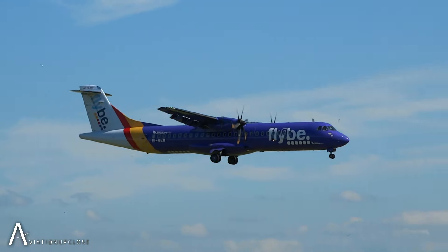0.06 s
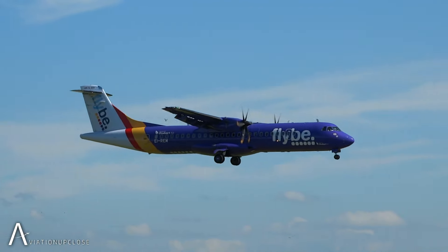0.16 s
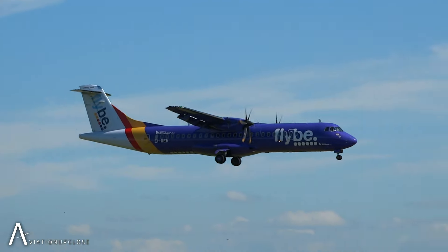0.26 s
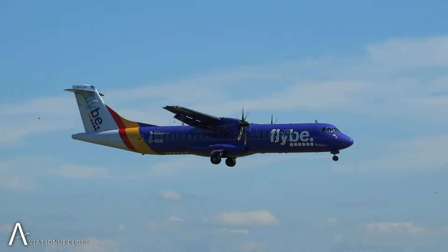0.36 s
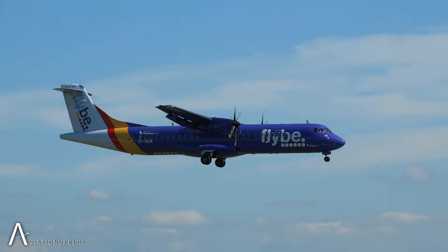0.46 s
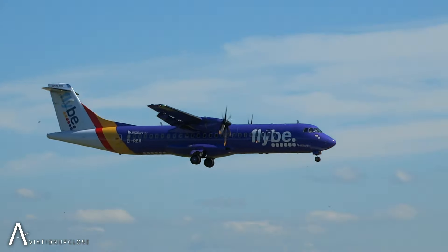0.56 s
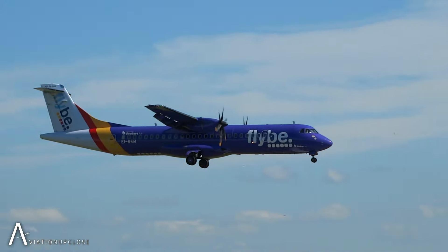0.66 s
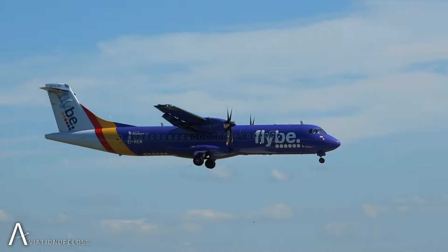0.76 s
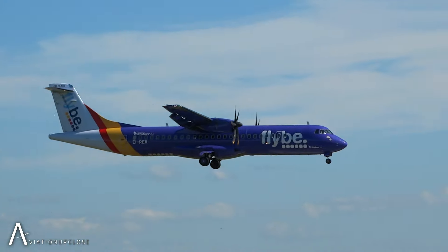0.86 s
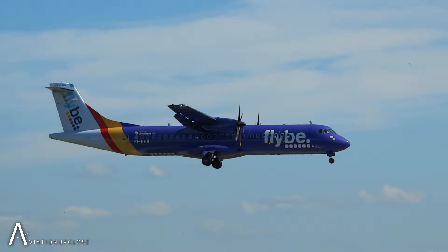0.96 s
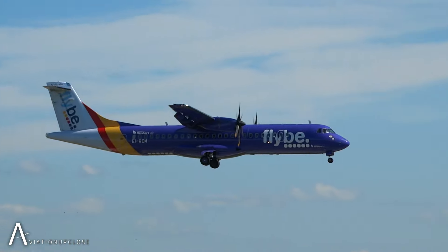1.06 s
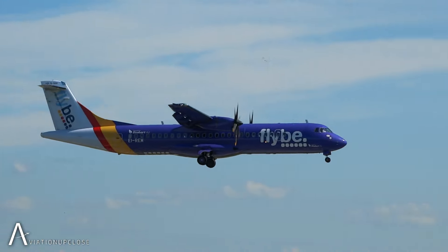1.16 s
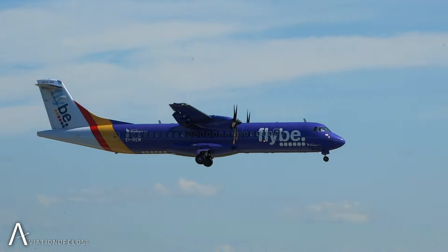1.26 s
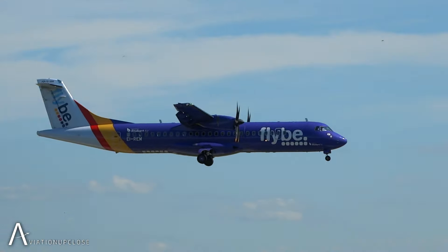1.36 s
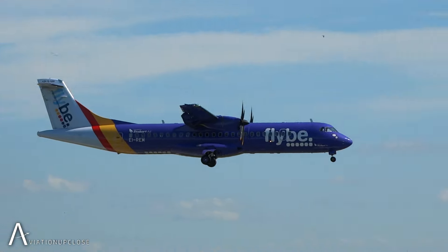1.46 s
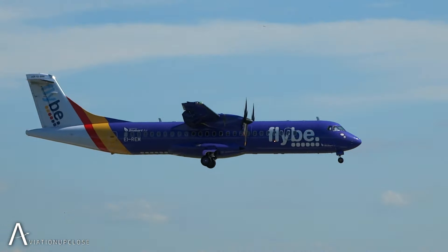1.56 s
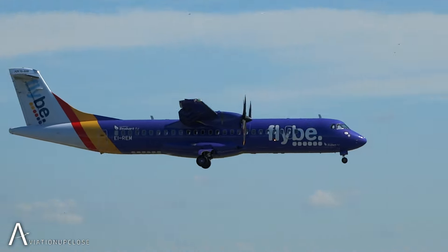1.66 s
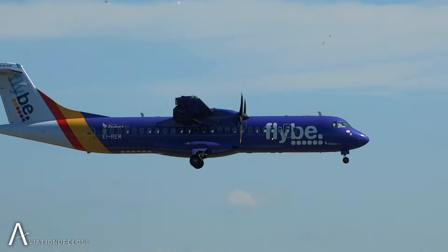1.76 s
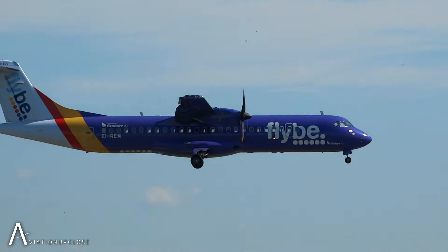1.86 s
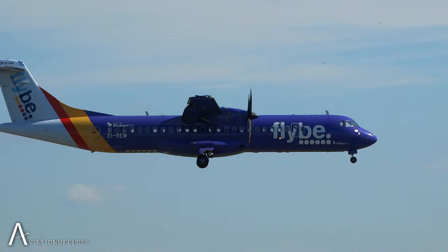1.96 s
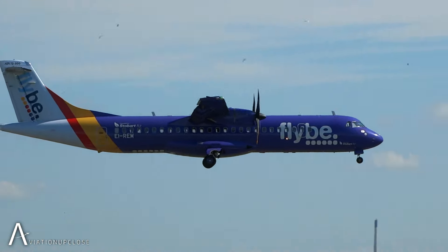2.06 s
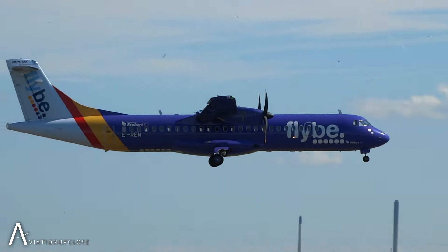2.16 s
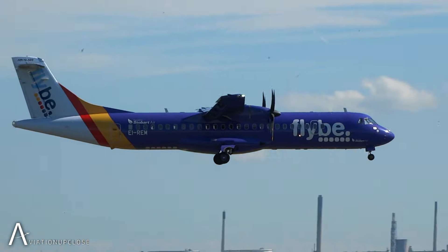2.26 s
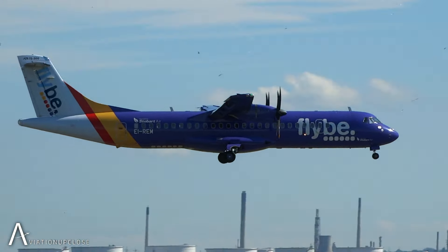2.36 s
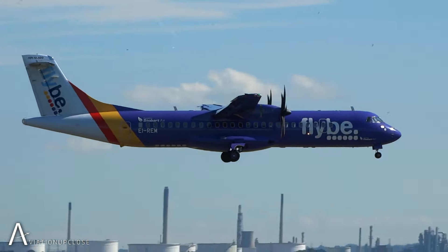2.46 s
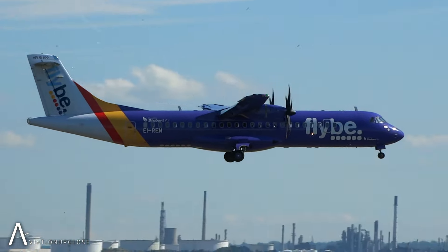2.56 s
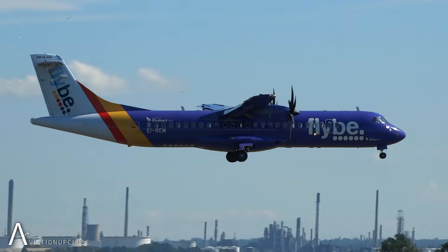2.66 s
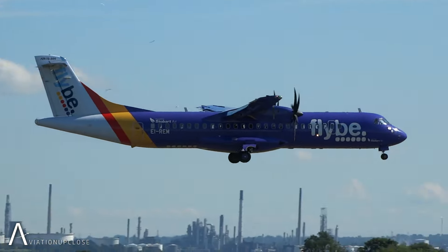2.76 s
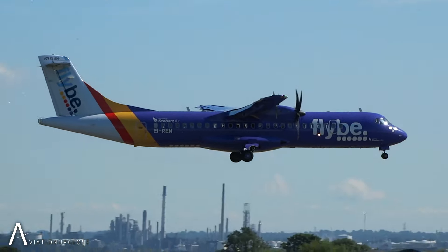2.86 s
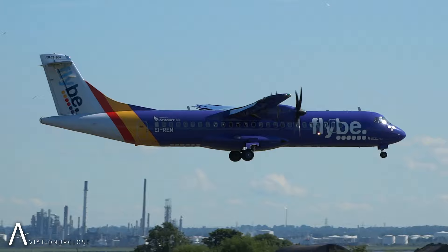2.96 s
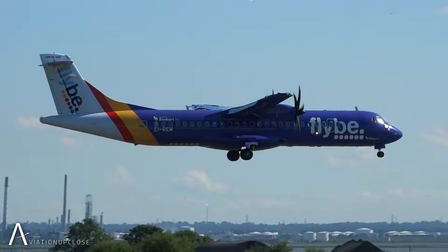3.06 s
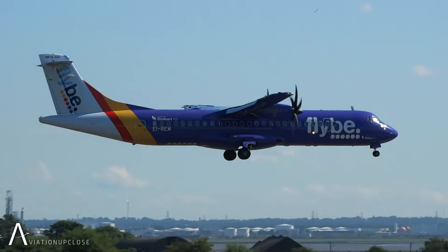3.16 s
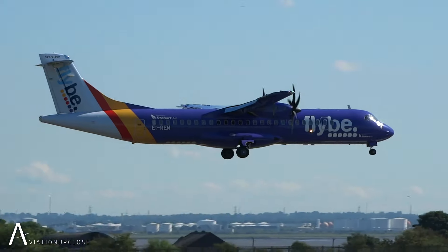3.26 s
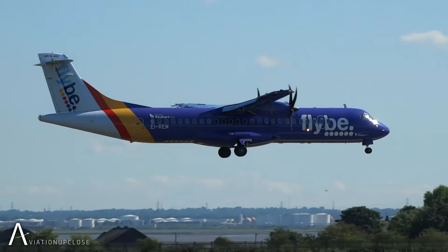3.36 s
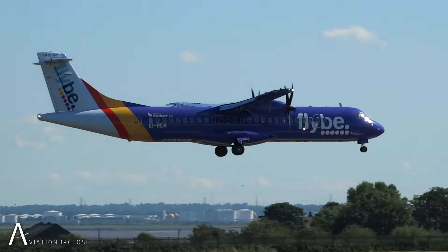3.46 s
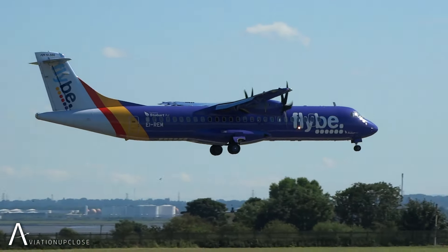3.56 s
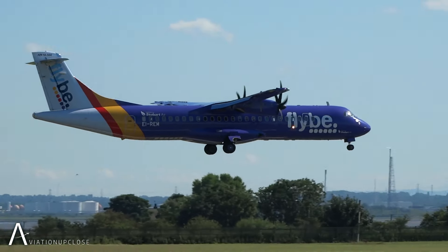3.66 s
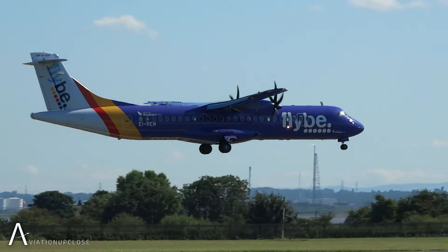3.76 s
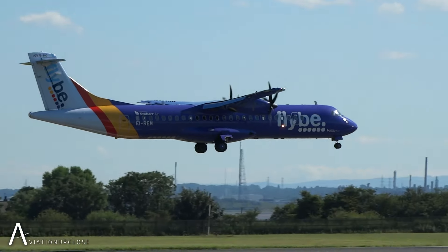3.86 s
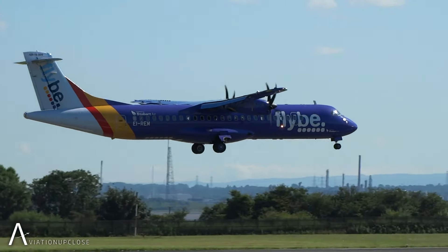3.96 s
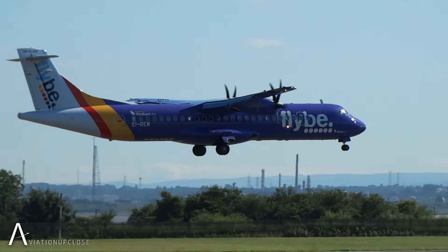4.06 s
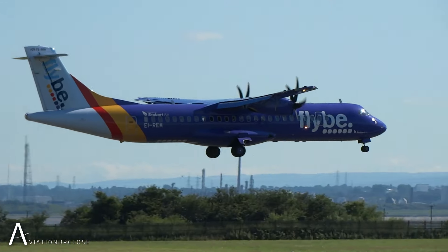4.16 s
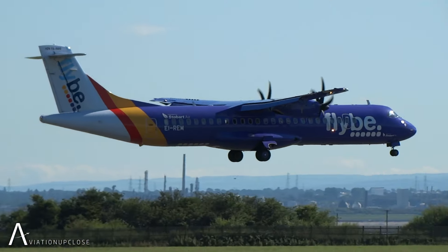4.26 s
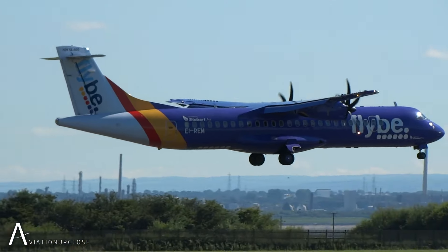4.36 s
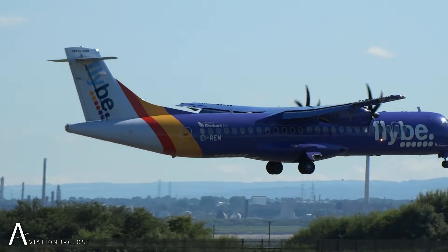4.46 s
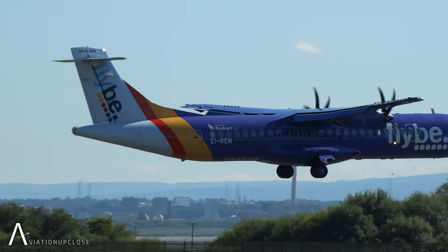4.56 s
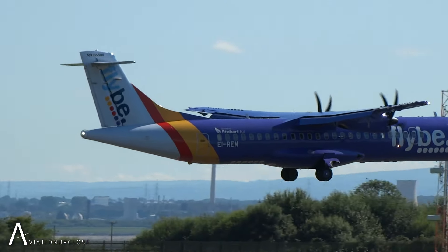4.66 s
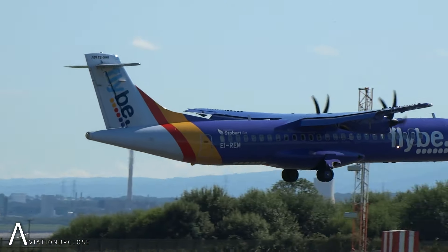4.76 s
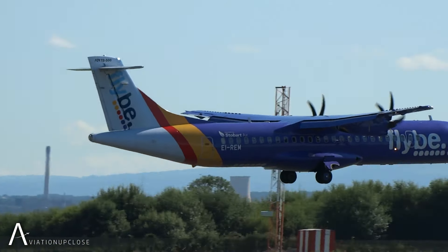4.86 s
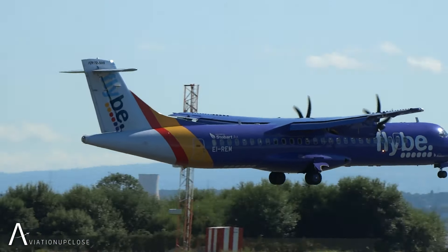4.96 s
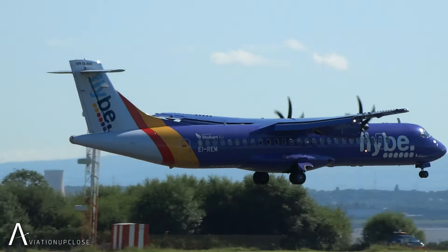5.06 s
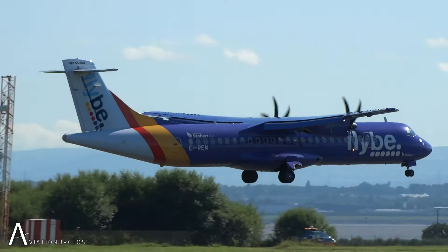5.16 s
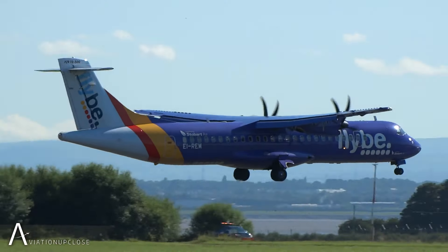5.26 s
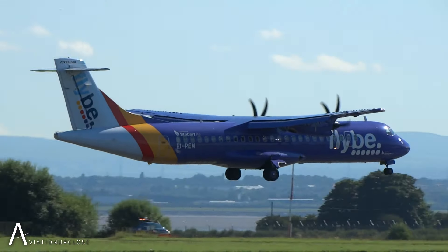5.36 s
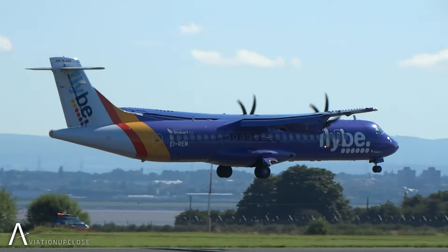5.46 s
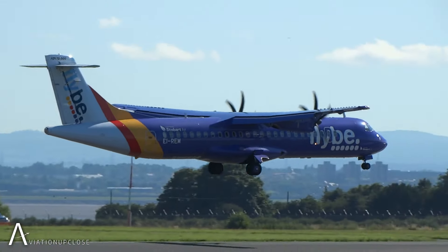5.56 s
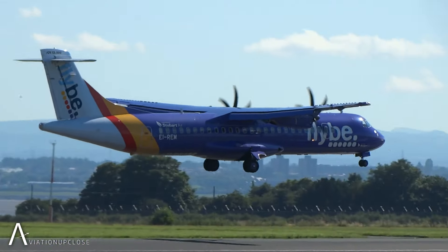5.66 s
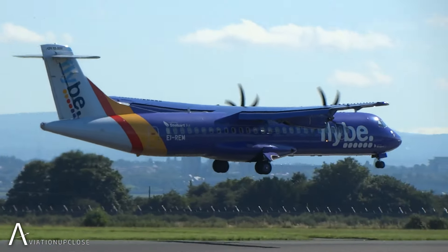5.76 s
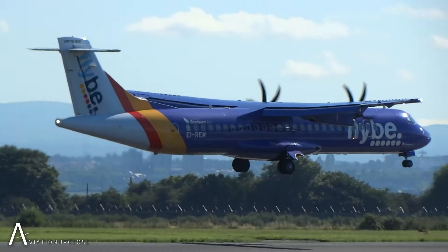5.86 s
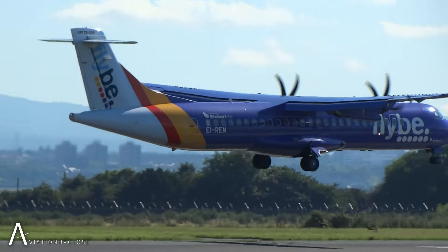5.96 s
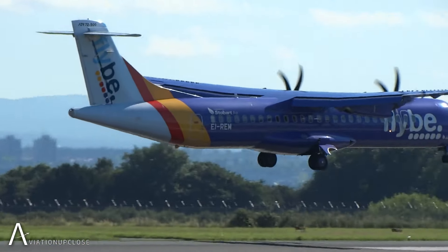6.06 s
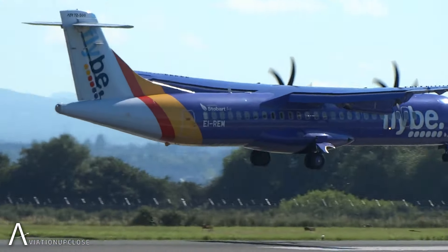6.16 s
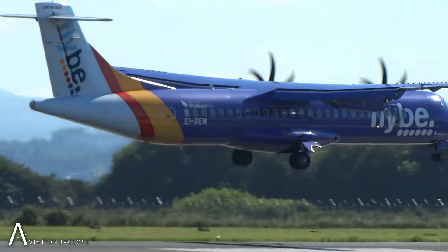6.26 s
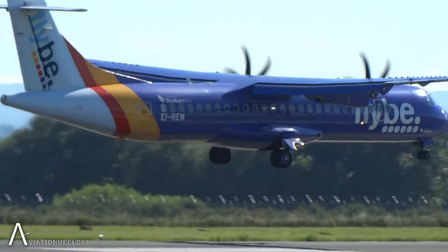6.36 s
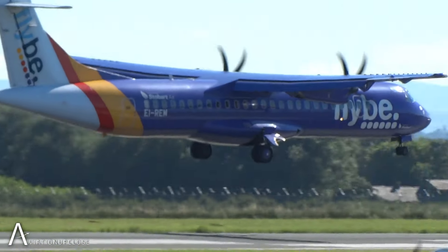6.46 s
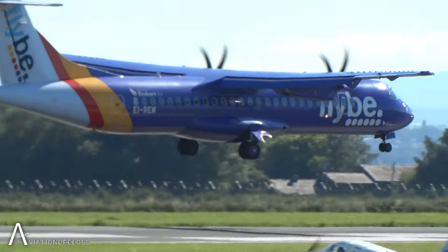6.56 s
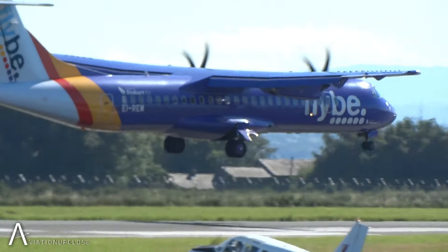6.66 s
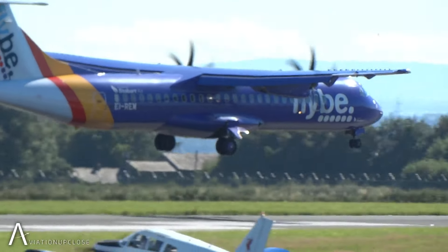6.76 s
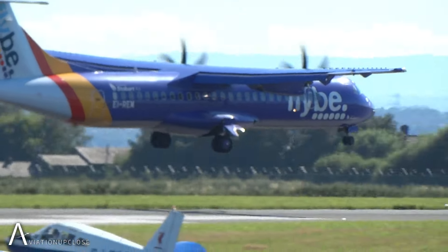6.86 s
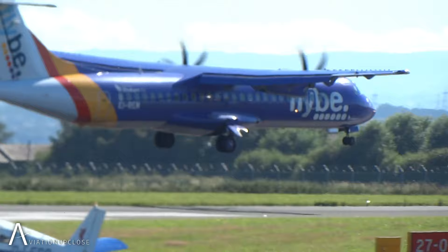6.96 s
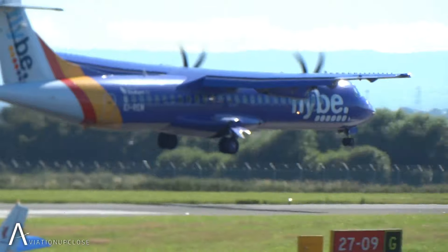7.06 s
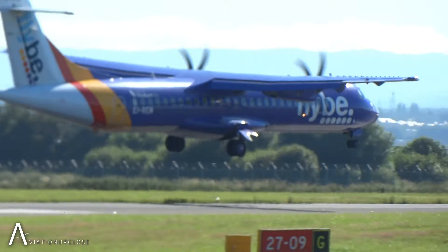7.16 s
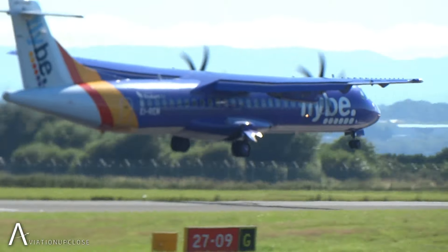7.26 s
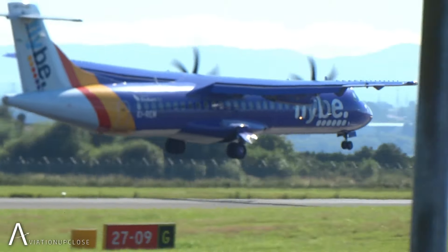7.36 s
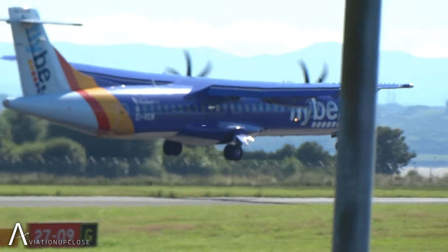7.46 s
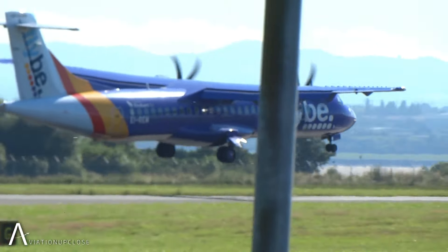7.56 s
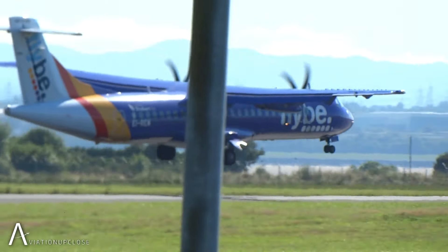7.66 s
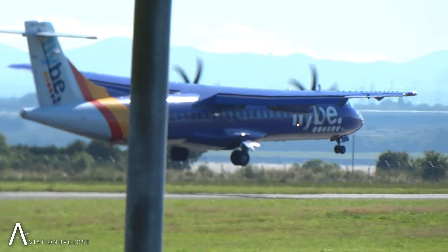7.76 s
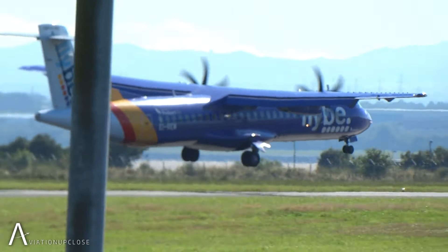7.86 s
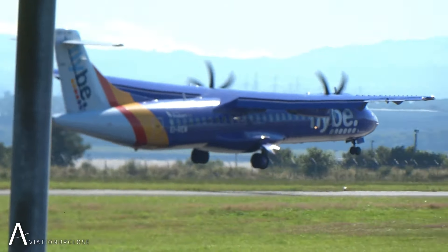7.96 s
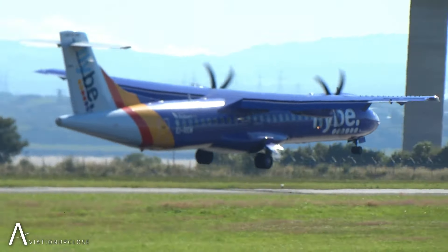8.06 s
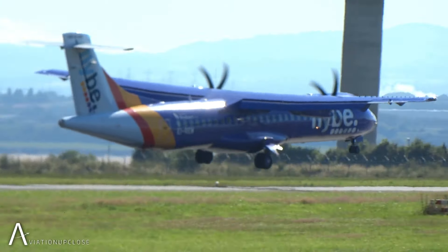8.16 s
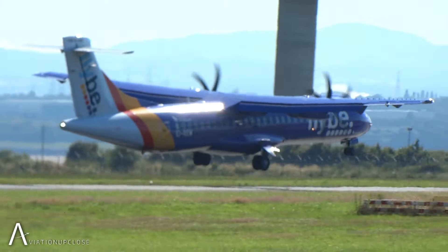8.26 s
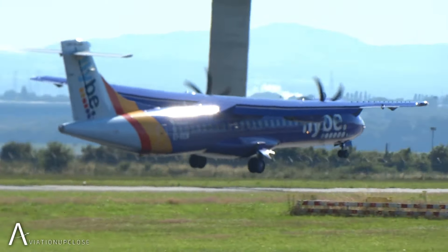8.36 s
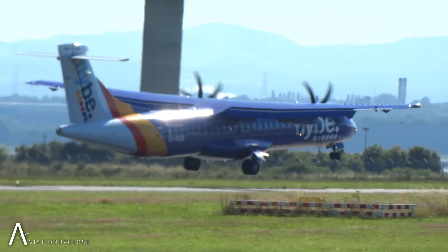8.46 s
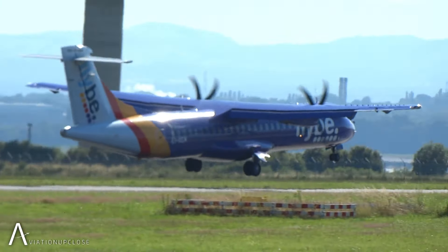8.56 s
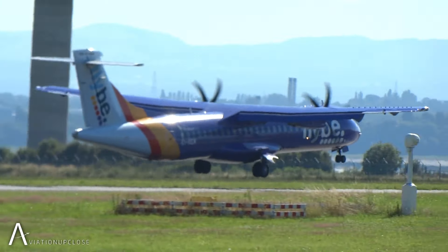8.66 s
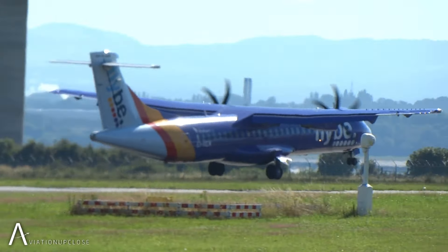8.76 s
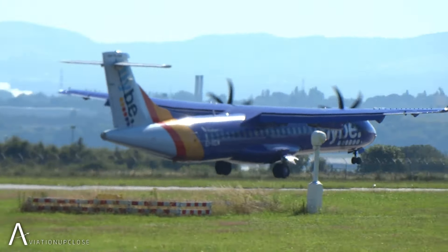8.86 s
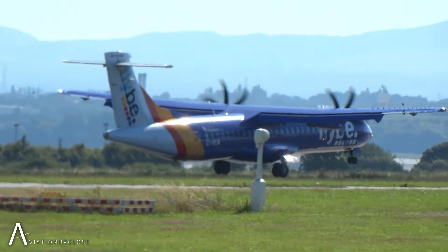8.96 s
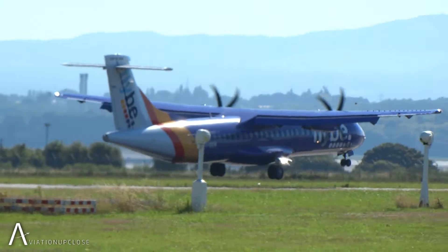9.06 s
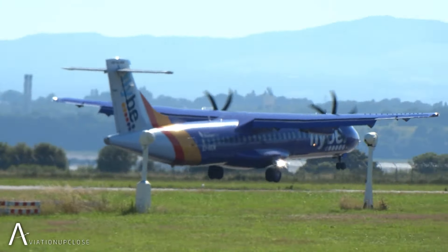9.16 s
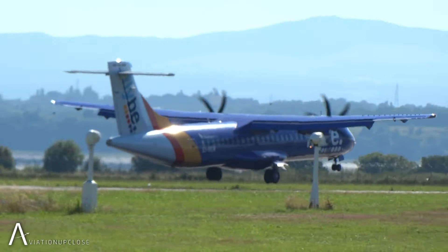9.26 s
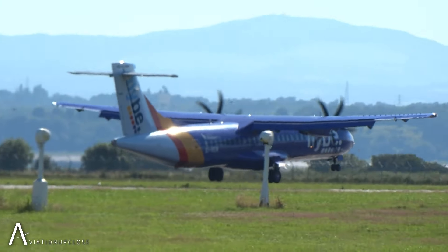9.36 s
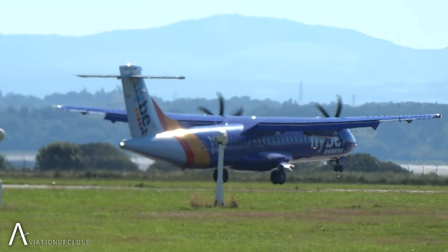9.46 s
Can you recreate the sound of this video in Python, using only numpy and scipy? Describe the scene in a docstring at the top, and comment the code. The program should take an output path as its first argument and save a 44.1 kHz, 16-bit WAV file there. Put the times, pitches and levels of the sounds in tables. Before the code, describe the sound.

Outdoors at an airfield, a twin-propeller airliner on approach is already loud: a howling, airy roar with gear whine and piercing turbine whistles. It flutters and surges in quick swells, the tones sliding down as it passes around three seconds. Then the roar darkens and fades unevenly, leaving a softer rush, a faint low engine drone and distant rumble. Stereo microphones stay nearby, the image nearly central.

```python
"""A twin-turboprop airliner on final approach passes by from left to right and sinks away over the runway.
It comes in as a roar of coloured noise that swells and dips, with a thin high whistle.
The gear whine and the engine whistles are scattered tones that slide down with the Doppler shift.
As the roar recedes, a faint engine drone of a few partials comes through; the field rumbles throughout."""
import sys
import numpy as np
from scipy import signal
from scipy.fft import rfft, irfft, next_fast_len
from scipy.io import wavfile
from scipy.ndimage import uniform_filter1d

SR = 44100
rng = np.random.default_rng(int(sys.argv[2]) if len(sys.argv) > 2 else 0)


def log_audio(samples):
    """Write samples as a 16-bit WAV file to the path given in sys.argv[1]."""
    # one column per channel
    frames = np.atleast_2d(samples).T
    # limit to full scale, then quantise
    limited = np.clip(frames, -1, 1)
    pcm = np.round(limited * 32767).astype(np.int16)
    wavfile.write(sys.argv[1], SR, pcm)


N = 419832
TIME = np.arange(N) / SR


def undb(db):
    """Decibels to gain."""
    return 10 ** (np.asarray(db) / 20)


def unit(x):
    """Scale to rms 1."""
    return x / np.sqrt(np.mean(np.abs(x) ** 2))


def curves(table):
    """Each column of a table as a curve over time."""
    s, *columns = np.transpose(table)
    return [np.interp(TIME, s, c) for c in columns]


def over_pitch(f, hz, values):
    """Read values at frequencies f, on a logarithmic pitch scale."""
    return np.interp(np.log(f), np.log(hz), values)


def shape(x, gain):
    """Filter with a gain given as a function of frequency."""
    size = next_fast_len(N)
    f = np.maximum(np.arange(size // 2 + 1) * SR / size, 1)
    return irfft(rfft(x, size) * gain(f), size)[:N]


def noise(spectrum):
    """Noise of rms 1 with a colour of (Hz, dB) points, falling 12 dB per octave beyond the ends."""
    hz, db = np.transpose(spectrum)

    def colour(f):
        ends = np.minimum(1, np.minimum(f / hz[0], hz[-1] / f)) ** 2
        return undb(over_pitch(f, hz, db)) * ends

    return unit(shape(rng.standard_normal(N), colour))


def walk(rate):
    """Smooth chance of rms 1 that changes about rate times a second."""
    k = max(int(SR / rate), 1)
    count = N // k + 3
    steps = np.interp(np.arange(N) / k + rng.random(), np.arange(count), rng.standard_normal(count))
    return unit(uniform_filter1d(steps, k))


def tone(hz, flutter_rate, scatter):
    """A whistle of rms 1: the direct ray plus rays scattered by eddies, with wandering phase."""
    rays = unit(1 + scatter * (walk(flutter_rate) + 1j * walk(flutter_rate)))
    return np.sqrt(2) * np.real(rays * np.exp(2j * np.pi * np.cumsum(hz) / SR))


# Blend of three roar colours. Each row: time in seconds, colour (0 howling, 1 duller, 2 low and dark).
COLOUR_BLEND = [(0, 0), (3.3, 0.28), (4.7, 1.13), (6.2, 1.02), (7, 1.83), (7.6, 1.24), (8.3, 1.8)]


def eddies(x, patchy_db, seconds, width_hz, size=1024):
    """Turbulence lifts and dims patches of the spectrum, most at high pitches and in the howling colour."""
    hz, s, frames = signal.stft(x, SR, nperseg=size)
    patches = rng.standard_normal(frames.shape)
    for _ in range(2):
        patches = uniform_filter1d(patches, max(int(seconds / s[1]), 1), axis=1)
        patches = uniform_filter1d(patches, max(int(width_hz / hz[1]), 1), axis=0)
    by_pitch = np.interp(hz, [300, 1400, 2400, 4500], [0.15, 0.33, 0.63, 0.63])
    by_colour = 1 / (1 + np.interp(s, *np.transpose(COLOUR_BLEND)))
    depth_db = patchy_db * np.outer(by_pitch, by_colour)
    return signal.istft(frames * undb(depth_db * unit(patches)), SR, nperseg=size)[1][:N]


def register(x, low_hz, high_hz, db):
    """One register of the roar, its loudness evened out and then carried at the given level."""
    part = shape(x, lambda f: 1 / np.sqrt((1 + (low_hz / f) ** 20) * (1 + (f / high_hz) ** 20)))
    return part * undb(db) / np.sqrt(uniform_filter1d(part ** 2, SR // 6))


# The three colours of the roar. Each row: frequency in Hz, relative density in dB per Hz.
HOWLING = [(120, -36), (250, -13.5), (400, -10.5), (520, -3), (980, -6), (1400, -2), (2000, 3.5), (2300, 6),
           (2800, 1), (3650, -14.5), (4150, -12.5), (4800, -14), (6500, -5), (8100, -13), (8700, -22.5),
           (11000, -39.5)]
DULLER = [(130, -30.5), (400, -13.5), (860, -2.5), (1400, 1), (2250, -1.5), (2640, -4.5), (3180, -14.5),
          (3900, -20.5), (4500, -18.5), (5850, -10), (6550, -10), (8000, -20), (10800, -47.5)]
LOW_AND_DARK = [(160, -28), (230, -16.5), (350, -8.5), (520, -4.5), (750, 2.5), (1200, -1.5), (1600, -0.5),
                (1930, -5.5), (2330, -3), (3050, -9), (3550, -8.5), (3950, -19.5), (5100, -21.5),
                (6000, -14), (7900, -17), (10500, -51)]


def roar(rush_db, wash_db, howl_db, hiss_db):
    """Turbulence from airframe, propellers and engines; its colour turns as the aircraft goes by."""
    blend, = curves(COLOUR_BLEND)
    air = 0
    for k, colour in enumerate([HOWLING, DULLER, LOW_AND_DARK]):
        share = np.maximum(1 - np.abs(blend - k), 0)
        air = air + np.sqrt(share) * noise(colour)
    air = eddies(air, patchy_db=4.5, seconds=.035, width_hz=220)
    rush = register(air, 60, 1052, rush_db)
    wash = register(air, 1220, 2035, wash_db)
    howl = register(air, 2126, 3015, howl_db)
    hiss = register(air, 3630, 10260, hiss_db)
    # small eddies make the howl and the hiss flutter, short wavelengths most
    flutter_db = 0.71 * walk(18) + 0.39 * walk(200)
    hiss_flutter_db = 0.52 * walk(190)
    return rush + wash + undb(flutter_db) * (howl + undb(hiss_flutter_db) * hiss)


# Level of the low airframe rush. Each row: time in seconds, level in dB.
RUSH = [(0, -30.5), (1.2, -26.5), (3, -29.5), (4.05, -29.5), (4.4, -34), (5.2, -35.5), (6.4, -41.5),
        (8.5, -42), (9.52, -40.5)]
# Level of the engine roar between swells. Each row: time in seconds, level in dB.
ROAR = [(0, -31), (2.4, -29.5), (4.1, -32), (5.7, -36), (6.9, -39.5), (8.5, -44), (9.52, -42)]
HOWL_DB, HISS_DB = -0.73, -1.7  # relative to the roar
# the intakes turn out of sight and their hiss drops
SHADOW_S, SHADOW_FADE_S, SHADOW_DB = 5.55, 0.98, -5.5


def register_levels():
    """Levels in dB of rush, wash, howl and hiss: the slow fade of the pass."""
    (rush_db,), (roar_db,) = curves(RUSH), curves(ROAR)
    shadow_db = SHADOW_DB * np.clip((TIME - SHADOW_S) / SHADOW_FADE_S, 0, 1)
    return rush_db, roar_db, roar_db + HOWL_DB, roar_db + HISS_DB + shadow_db


# Swells and dips of the sound, some brief and some seconds long, each in its own range of pitches.
# Each row: centre in seconds, length in seconds, boost in dB, centre in Hz, spread in octaves either way.
SWELLS = [(0.418, 0.25, 5, 6560, 2.3), (.25, 0.75, 1.5, 1650, 0.18), (.64, 0.095, 12.5, 2430, 0.095),
          (0.717, .99, 7.5, 3340, 0.15), (0.835, 0.19, 6, 2520, 1.76), (0.923, .085, 7, 7400, 0.38),
          (1.14, 0.19, 9.5, 1500, 0.47), (1.346, 0.17, 11.5, 3170, 0.51), (1.56, 0.36, 7, 2300, 0.17),
          (1.333, 0.15, 5.5, 7450, 0.54), (1.645, 0.25, 12.5, 3260, 0.18), (1.74, .2, 4.5, 7500, 0.69),
          (1.76, 0.39, 9, 1760, 0.22), (2.04, 0.22, 6.5, 3960, 2.1), (2.286, 0.23, 8, 3800, 1.7),
          (2.448, .7, 4, 2340, 0.14), (2.628, 0.34, 6, 4850, 1.74), (2.943, .19, 7.5, 2650, 2),
          (2.863, 0.15, 5, 950, 0.54), (2.945, 0.18, 7, 2610, 0.12), (3.03, 0.044, -6, 2400, 0.4),
          (2.9, 2.8, -2.5, 1790, 0.24), (3.124, .17, 6, 2430, 0.25), (3.186, .25, 8.5, 4200, 1.47),
          (3.38, 0.086, -2, 3000, 1.1), (3.56, 0.27, 10, 3720, 2.2), (3.56, 0.05, 4, 2500, .35),
          (3.76, .084, 7, 2800, .45), (3.858, 0.17, -4.5, 2100, 0.26), (3.95, 0.095, 4.5, 5700, 0.9),
          (4.52, 0.034, 8.5, 5850, .37), (4.88, 0.43, 6.5, 3300, 2.3), (5.262, .27, 10, 2470, 1.4),
          (5.427, 0.12, 8.5, 6170, 0.86), (5.53, 0.25, 8, 2220, 1), (5.95, 0.42, 5.5, 2700, 1.03),
          (6.184, 0.54, 7.5, 4200, 1.7), (6.187, 0.032, 5, 5900, 0.41), (6.57, 0.18, 5.5, 5200, 0.88),
          (7.594, 0.41, 8, 4150, 2.3), (7.71, 0.088, 8, 1880, .3), (7.993, 0.38, 4, 4570, 1.5),
          (8.6, 2.2, -3, 1290, 0.14)]
SWELL_STEEPNESS = 2.5  # 2 is a bell, more gives a flatter top and quicker flanks


def swells(x, size=1024):
    """Each swell lifts (or dims) a range of pitches, rising and falling smoothly around its centre."""
    hz, s, frames = signal.stft(x, SR, nperseg=size)
    lift_db = 0
    for at, length, boost_db, centre_hz, octaves in SWELLS:
        rise_and_fall = np.exp(-np.abs(2 * (s - at) / length) ** SWELL_STEEPNESS)
        reach = np.exp(-(np.log2(np.maximum(hz, 1) / centre_hz) / octaves) ** 2)
        lift_db = lift_db + boost_db * np.outer(reach, rise_and_fall)
    return signal.istft(frames * undb(lift_db), SR, nperseg=size)[1][:N]


# the pass: blade-passing rate at the aircraft, speed, moment and distance of closest approach
BLADE_HZ, SPEED_M_S, CLOSEST_S, DISTANCE_M = 76.44, 62.7, 2.69, 288.6


def doppler():
    """Pitch factor of a source flying past in a straight line."""
    along = SPEED_M_S * (TIME - CLOSEST_S)
    receding_m_s = SPEED_M_S * along / np.hypot(along, DISTANCE_M)
    return 1 / (1 + receding_m_s / 343)  # speed of sound in m/s


# Compressor whistle. Each row: time in seconds, level in dB relative to the hiss.
COMPRESSOR_BEAM = [(0, -6.5), (.4, -3.5), (.9, -7.5), (2.4, -19.5), (4.55, -16), (4.76, -8), (5.1, -16.5),
                   (5.95, -8), (6.2, -12), (6.62, -10), (6.85, -19), (8.03, -9), (8.2, -16)]


def compressors(blade_hz):
    """One whistle per engine: the far one on the approach, the near one taking over towards abeam."""
    near_share = np.clip(TIME / CLOSEST_S, 0, 1)
    near = np.sqrt(near_share) * tone(71.2 * blade_hz, flutter_rate=110, scatter=1.6)
    far = np.sqrt(1 - near_share) * tone(70.6 * blade_hz, flutter_rate=220, scatter=1.8)
    beam_db, = curves(COMPRESSOR_BEAM)
    return undb(beam_db + 1.0 * walk(17)) * (near + far)


# Pitches of the turbine whistles, as multiples of the blade rate.
TURBINE_LINES = [80.3, 81.6, 82.9, 84.3, 85.8, 87.4, 89, 90.6]
# Turbine whistles. Each row: time in seconds, level in dB relative to the hiss,
# multiple of the blade rate that is beamed at the listener.
TURBINE = [(0, -15, 80), (1.8, -16, 81), (2.2, -4.5, 81.6), (2.65, -2, 82.7), (3, -10, 83.5),
           (3.45, -9.5, 85.5), (4.2, -5.5, 89), (4.85, -8, 90.6), (5.2, -14, 83), (6.1, -2, 85.8),
           (6.7, -10, 85.6), (9.52, -23, 86)]
TURBINE_FLICKER_DB, TURBINE_FLICKER_HZ = 4.5, 89.8  # rms depth and rate of the quick trill in level


def turbines(blade_hz):
    """A cluster of rough whistles, each with its own beam that sweeps over the listener in turn."""
    db, beamed = curves(TURBINE)
    beams = [1 / (1 + ((k - beamed) / 1.0) ** 2) for k in TURBINE_LINES]
    cluster = 0
    for beam, k in zip(beams, TURBINE_LINES):
        cluster = cluster + beam * tone(k * blade_hz, flutter_rate=280, scatter=1.9)
    cluster = cluster / np.linalg.norm(beams, axis=0)
    trill = tone(np.full(N, TURBINE_FLICKER_HZ), flutter_rate=20, scatter=1)
    flicker = unit(undb(TURBINE_FLICKER_DB * trill))
    return undb(db) * flicker * cluster


# Gear whine, beamed forwards. Each row: time in seconds, level in dB.
GEAR = [(0, -35), (.3, -38), (.42, -29), (1.25, -29.5), (1.64, -35), (2.25, -31), (3.1, -38), (3.65, -32.5),
        (4.2, -36), (4.6, -57), (6.6, -56), (7.3, -49), (8.2, -61)]


def gearboxes(blade_hz):
    """The whine of two propeller gearboxes that beat against each other until the far one fades."""
    near = tone(12.5 * blade_hz, flutter_rate=30, scatter=0.12 + 0.058 * TIME)
    far = undb(-4.5 - 2.2 * TIME) * tone(12.86 * blade_hz, flutter_rate=16, scatter=0.24)
    level_db, = curves(GEAR)
    return undb(level_db) * (near + far)


# Rate and strength of the engine drone. Each row: time in seconds, rate in Hz, gain in dB.
DRONE_RATE = [(4.6, 70.2, -10), (5.4, 69.8, 1), (5.85, 67.7, 1), (6.6, 67.3, -1), (7.25, 69.5, 2.5),
              (8.4, 68.1, -1), (9.52, 68.2, 1.5)]
# Partials of the drone. Each row: multiple of its rate, level in dB before that gain.
DRONE = [(5, -61), (6, -61.5), (7, -62.5), (9, -60), (10, -53), (11, -57.5)]
DRONE_FADE_DB, DRONE_WANDER = 1.5, .002  # rms fade of each partial; rms share by which the pitch wanders


def drone():
    """A faint engine drone that sags and recovers in pitch while its partials fade in and out."""
    hz, level_db = curves(DRONE_RATE)
    hz = hz * (1 + DRONE_WANDER * walk(2))
    partials = 0
    for k, db in DRONE:
        fade = unit(undb(DRONE_FADE_DB * walk(2.05)))
        partials = partials + undb(db) * fade * tone(k * hz, flutter_rate=9, scatter=0.45)
    return undb(level_db) * partials


# Thin high whistle. Each row: time in seconds, pitch in Hz, level in dB.
THIN_WHISTLE = [(.5, 8550, -60), (.6, 9800, -59), (.8, 9140, -48), (1, 8550, -63), (1.11, 9120, -50),
                (1.24, 8700, -53), (1.35, 9400, -48), (1.54, 8700, -62), (1.64, 9000, -54),
                (1.72, 8750, -62)]


def thin_whistle():
    """A faint high whistle that wanders up and down during the approach."""
    hz, db = curves(THIN_WHISTLE)
    sounding = (TIME > THIN_WHISTLE[0][0]) & (TIME < THIN_WHISTLE[-1][0])
    return sounding * undb(db) * tone(hz * (1 + 0.002 * walk(60)), flutter_rate=200, scatter=0.45)


# Sound scattered back by the field. Each row: frequency in Hz, level in dB relative to the direct sound.
DIFFUSE = [(130, -30), (700, -25), (1150, -17.5), (2200, -28), (3900, -13.5), (6500, -28.5)]


def scattered(x):
    """The field sends a little sound back 37 ms late."""
    hz, db = np.transpose(DIFFUSE)
    late = np.pad(x, (int(.037 * SR), 0))[:N]
    return shape(late, lambda f: undb(over_pitch(f, hz, db)))


# Colour of the distant airfield rumble. Each row: frequency in Hz, relative density in dB per Hz.
FIELD = [(20, -21), (55, -12), (72, -2.5), (95, -1), (250, -17.5), (600, -37)]
FIELD_SIDE_DB = -30  # share of the rumble that differs between left and right


def airfield():
    """Distant rumble of low noise that slowly sinks."""
    apart = undb(FIELD_SIDE_DB) * np.array([[1], [-1]]) * noise(FIELD)
    return undb(-63 - 0.6 * TIME) * (noise(FIELD) + apart)


# Balance of the aircraft. Each row: time in seconds, left minus right in dB.
PAN = [(0, .5), (6, 0), (7, -1.2), (9.52, -1.5)]


def scene():
    """The aircraft crosses from left to right; a little of its sound comes back diffusely from the field."""
    blade_hz = BLADE_HZ * doppler()
    rush_db, wash_db, howl_db, hiss_db = register_levels()
    whistles = undb(hiss_db) * (compressors(blade_hz) + turbines(blade_hz))
    passing = roar(rush_db, wash_db, howl_db, hiss_db) + gearboxes(blade_hz) + whistles
    aircraft = swells(passing) + drone()
    pan_db, = curves(PAN)
    sides = np.array([[1], [-1]])
    direct = aircraft * undb(sides * pan_db / 2)
    # opposite sign left and right makes the scattered sound wide
    return direct + sides * scattered(aircraft) + airfield() + thin_whistle()


# Mismatch of the two microphones, half of it given to each side.
# Each row: frequency in Hz, nominal left minus right in dB, nominal lead of the left in radians.
PORTS = [(250, 0, -0.065), (800, 0.4, -0.17), (1050, 1, -0.23), (1450, -0.5, -0.2), (5000, 0.4, -.02)]
TOP_HZ = 10900


def record(dry):
    """Two microphones differ slightly in level and phase; a steep low-pass cuts the top."""
    hz, db, lead = np.transpose(PORTS)

    def port(x, side):
        response = undb(side * db / 2) * np.exp(1j * side * lead / 2)
        return shape(x, lambda f: over_pitch(f, hz, response))

    heard = np.array([port(dry[0], 1), port(dry[1], -1.07)])  # the right half is slightly stronger
    return signal.sosfilt(signal.ellip(8, .2, 70, TOP_HZ, fs=SR, output="sos"), heard)


dry = scene()
out = record(dry)
log_audio(out)
```